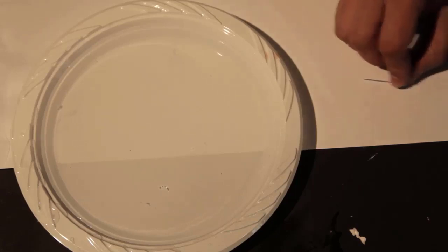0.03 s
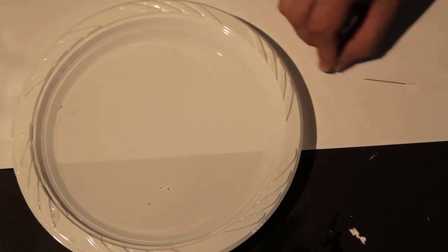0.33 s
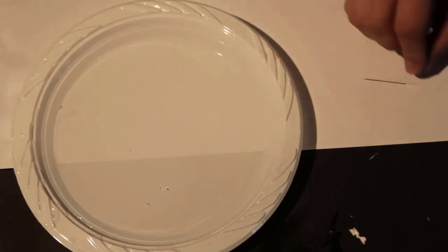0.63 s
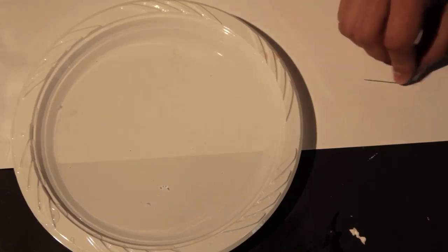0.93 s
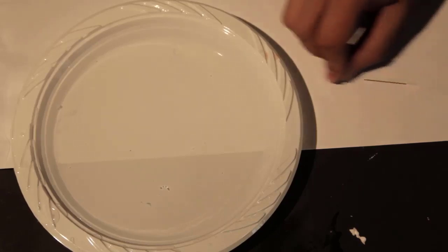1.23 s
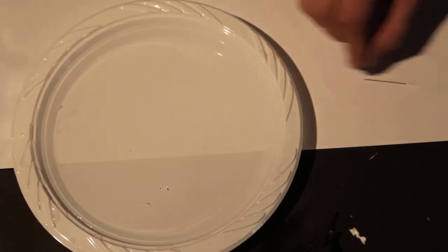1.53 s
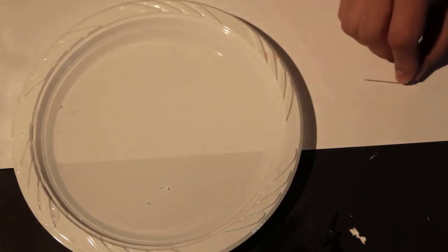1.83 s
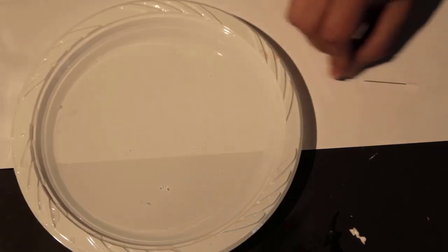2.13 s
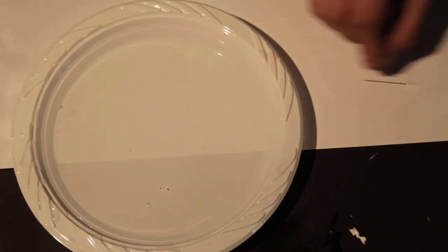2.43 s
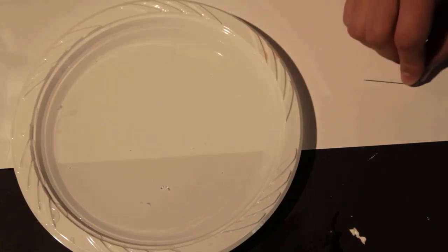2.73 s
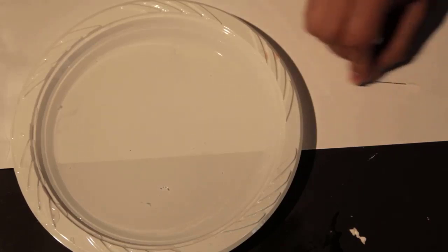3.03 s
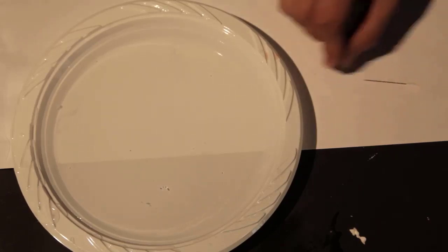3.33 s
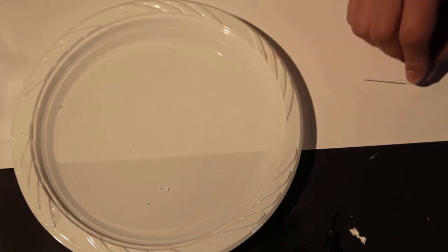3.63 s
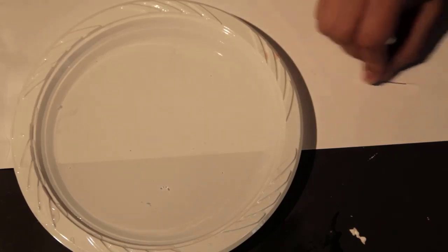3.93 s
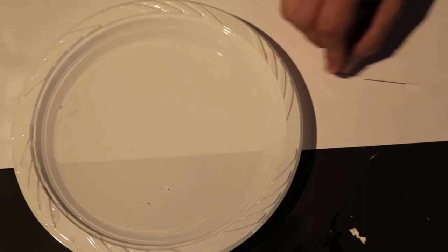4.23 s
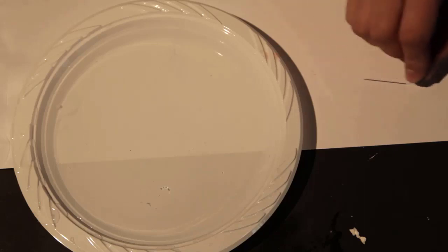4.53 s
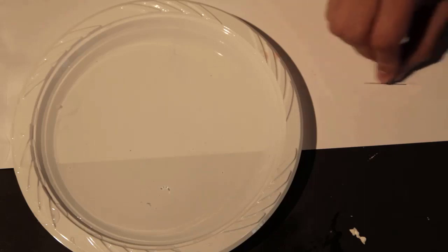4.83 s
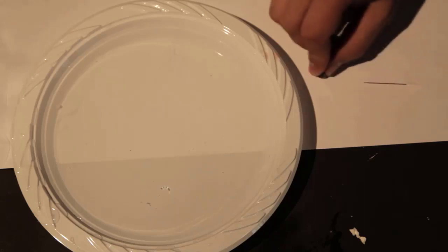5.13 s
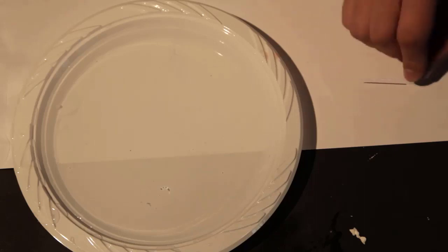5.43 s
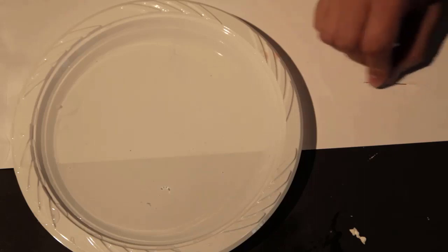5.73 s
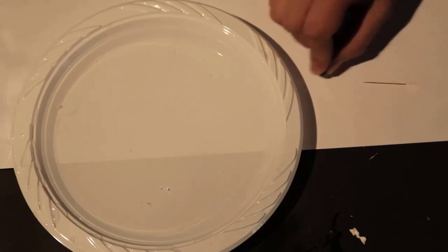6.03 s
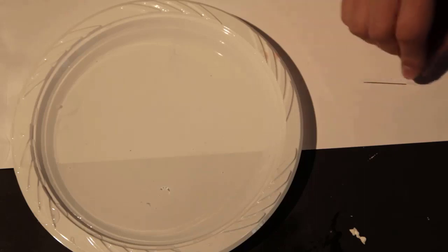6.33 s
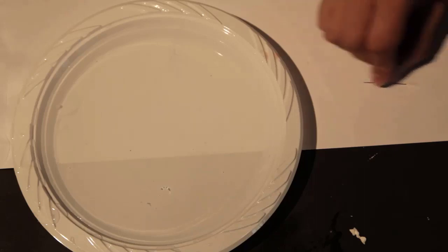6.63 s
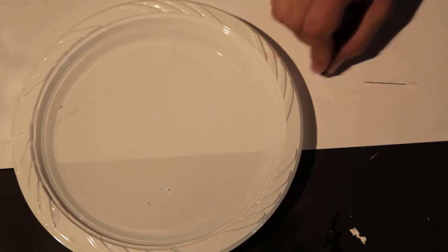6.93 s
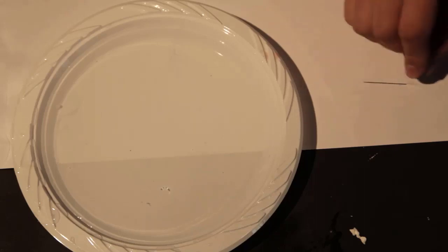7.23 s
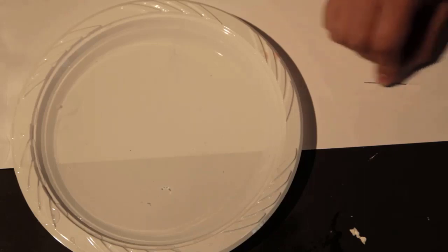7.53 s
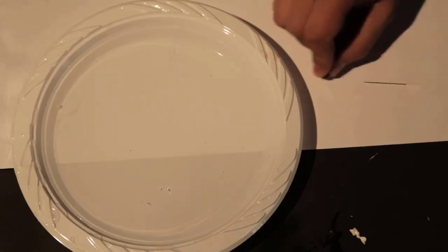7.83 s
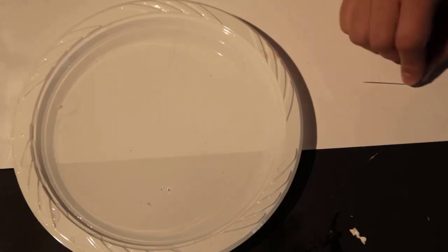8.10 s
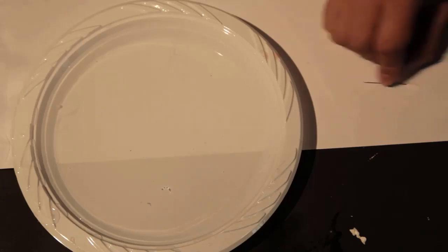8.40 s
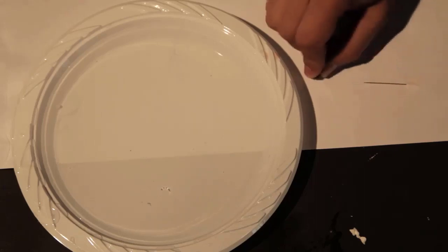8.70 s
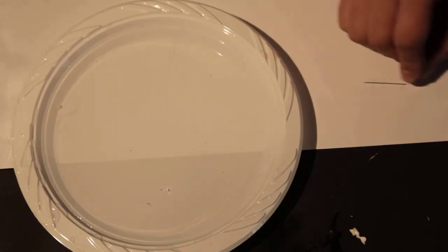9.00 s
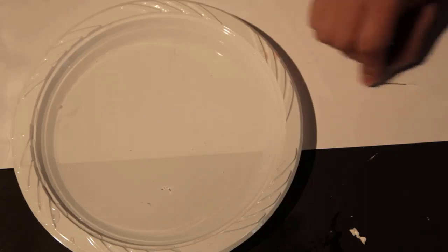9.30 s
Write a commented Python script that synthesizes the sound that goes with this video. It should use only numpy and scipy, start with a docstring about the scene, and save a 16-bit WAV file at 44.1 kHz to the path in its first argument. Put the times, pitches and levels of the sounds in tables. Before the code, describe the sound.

A low puff of air hits the close microphone as a needle starts scraping over paper in a quiet room. The short, papery strokes repeat steadily, eleven in all, each growing and easing off with a faint hollow rasp. Between them the hand lands on the table with a dull tap and the needle clicks. Tiny fibre snaps and brief judders roughen the rubbing, and the later landings are sharper.

```python
"""Stroking a needle on paper

Fingertips stroke a needle lying on a sheet of paper on a table: eleven short strokes in a quiet room.
The hand lands with a soft thud and the steel needle clicks. Slipping paper fibres hiss, and shake the
sheet and the table top into a murmur. Here and there a fibre snaps, or a stroke catches and judders.
Now and then moving air rumbles on the close microphone."""
import sys
import numpy as np
from scipy import signal
from scipy.fft import rfft, irfft
from scipy.io import wavfile
from scipy.ndimage import uniform_filter1d

SR = 44100
rng = np.random.default_rng(int(sys.argv[2]) if len(sys.argv) > 2 else 0)


def dump_mix(stems):
    """Bounce the given channels to the path in sys.argv[1] as a 16-bit WAV at rate SR."""
    frames = np.atleast_2d(stems).T  # one column per channel
    limited = np.clip(frames, -1, 1)  # hard clip at full scale
    pcm = np.round(limited * 32767).astype(np.int16)
    wavfile.write(sys.argv[1], SR, pcm)


N = 421596
TIME = np.arange(N) / SR
SHORT_TIME = np.arange(SR // 4) / SR   # a quarter second, for brief sounds


def from_db(db):
    """Turn decibels into a gain to multiply by."""
    return 10 ** (np.asarray(db) / 20)


def rms_one(x):
    """Scale a signal so that its average strength (rms) is 1."""
    return x / np.sqrt(np.mean(x ** 2) + 1e-20)


def colour(x, spectrum):
    """Shape the tone of a signal with rows of pitch in Hz and level in dB; the result has rms 1."""
    hz, db = np.transpose(spectrum)
    bin_hz = np.maximum(np.arange(len(x) // 2 + 1) * SR / len(x), 1)
    gain = from_db(np.interp(np.log(bin_hz), np.log(hz), db))
    return rms_one(irfft(rfft(x) * gain, len(x)))


def fade(t60):
    """A short dying curve that falls by 60 dB in t60 seconds."""
    return from_db(-60 * SHORT_TIME / t60)


def envelope(start, hold_s, db, rise_db_per_s, fall_db_per_s):
    """A gain that rises until the start time, holds, then fades."""
    early_s = np.maximum(start - TIME, 0)
    late_s = np.maximum(TIME - start - hold_s, 0)
    return from_db(db - rise_db_per_s * early_s - fall_db_per_s * late_s)


def flicker(depth_db, rate_hz):
    """A gain that wanders at random, typically by depth_db up or down."""
    steps = rng.standard_normal(2000)
    wander = np.interp(TIME * 2 * rate_hz, np.arange(len(steps)), steps)
    return from_db(depth_db * rms_one(wander))


def add(track, start, sound):
    """Mix a sound into a track at a start time in seconds."""
    first = max(round(start * SR), 0)
    track[first:first + len(sound)] += sound[:N - first]


# The tone of the quiet room. Each row: pitch in Hz, relative level in dB.
HUSH_TONE = [(15, 2.5), (35, 1), (80, -2.5), (135, 2), (230, -4), (380, -7.5), (450, -4), (600, -11.5),
             (780, -11.5), (1030, -11.5), (1150, -15), (1450, -14.5), (2200, -19.5), (4000, -29.5),
             (9000, -50)]
# How loud the far background is. Each row: time in seconds, level in dB.
HUSH_LEVELS = [(0.6, -50), (1.6, -53), (2.6, -53.5), (3.5, -54.5), (4.5, -56), (5.4, -55), (6.3, -57.5),
               (7.2, -59), (8.1, -52.5), (9.0, -52.5)]

def background():
    """The low hush of the room and the microphone's own faint hiss."""
    loudness = from_db(np.interp(TIME, *np.transpose(HUSH_LEVELS)))
    hush = loudness * colour(rng.standard_normal(N), HUSH_TONE)
    return hush + from_db(-68) * rng.standard_normal(N)


# Gusts on the microphone. Each row: start in seconds, length in seconds, relative strength in dB.
GUSTS = [(0.0, 0.081, 1.5), (0.265, .1, -2.5), (0.463, 0.027, -4.5), (1.988, 0.029, -13.5),
         (2.128, 0.15, -16.5), (2.286, 0.027, -11), (2.432, 0.026, -20), (4.114, .16, -17.5),
         (4.48, .17, -15), (6.785, 0.41, -22.5), (7.43, 0.13, -24.5)]

def airflow():
    """How strongly the air moves: gusts, the weak swirls they leave, and the stir of the moving hand."""
    flows = []
    for start, length, db in GUSTS:
        gust = envelope(start, length, db, rise_db_per_s=143, fall_db_per_s=119)
        wake = envelope(start, length, db - 21, rise_db_per_s=143, fall_db_per_s=20)
        flows += [gust, wake]
    for touch, fastest, *_ in STROKES:
        stir = envelope(touch, fastest - touch, db=-41.5, rise_db_per_s=156, fall_db_per_s=30)
        flows.append(stir)
    return np.max(flows, axis=0)


# The tones of big and of small swirls of air. Each row: pitch in Hz, relative level in dB.
BIG_SWIRL_TONE = [(6, -12), (14, -3), (27, 1.5), (40, -7), (48, -7.5), (62, -14), (76, -30), (140, -43),
                  (300, -70), (1000, -105)]
SMALL_SWIRL_TONE = [(20, -10), (55, 0), (72, 0), (130, -22.5), (200, -33), (1000, -96)]

def air_rumble():
    """Slow swirls press on the microphone; strong gusts break up into smaller, lumpy ones."""
    big = signal.hilbert(colour(rng.standard_normal(N), BIG_SWIRL_TONE))
    strength = np.sqrt(uniform_filter1d(np.abs(big) ** 2 / 2, size=SR // 5))
    flow = airflow()
    rumble = from_db(-7) * flow * big.real / strength   # evened out, so the flow sets the loudness
    small = colour(rng.standard_normal(N), SMALL_SWIRL_TONE) * flicker(depth_db=4.7, rate_hz=23)
    return rumble + from_db(-19.5) * flow ** 2 * small


def with_room_echo(sound, t60, echo_db):
    """Nearby walls add a faint wash of echoes that builds up, then dies."""
    tail = rng.standard_normal(len(SHORT_TIME)) * fade(t60) * (1 - fade(0.038))
    echoes = signal.fftconvolve(sound, tail / np.linalg.norm(tail))[:N]
    return sound + from_db(echo_db) * echoes


def ringing(notes, spread_db):
    """A struck object rings at its own notes, each with a slightly random strength."""
    out = 0
    for hz, db, t60 in notes:
        gain = from_db(db + spread_db * rng.standard_normal())
        out += gain * fade(t60) * np.sin(2 * np.pi * hz * SHORT_TIME)
    return out


def fibre_slips(per_s, spread_db):
    """Paper fibres slip at random moments with uneven force, making tiny ticks; rms 1."""
    sizes = from_db(spread_db * np.minimum(rng.exponential(1, N), 5))
    slipping = rng.random(N) < per_s / SR
    return rms_one(slipping * sizes * rng.choice([-1, 1], N))


def crack(tone, t60):
    """A few fibres break at once in a burst of noise; peak 1."""
    burst = colour(rng.standard_normal(len(SHORT_TIME)), tone) * fade(t60)
    return burst / np.abs(burst).max()


# The notes of the table top. Each row: pitch in Hz, relative level in dB, seconds to fade by 60 dB.
TABLE_NOTES = [(97.8, -8, 0.35), (137.7, -1.5, 0.16), (262, -4.5, 0.031), (293, 0.5, 0.04),
               (358, -4, 0.029), (449, -1.5, 0.077), (654, -2.5, 0.03), (756, -9.5, 0.041),
               (898, -18, 0.087), (1214, -13.5, 0.037), (1430, -4.5, 0.016), (1710, -11.5, 0.034),
               (1900, -8, 0.024), (1870, -17.5, 0.0031), (2730, -16, 0.048), (3070, -13, 0.02),
               (3670, -11, 0.015)]

def knock(contact_s, ring_db, rebound_db, rebound_t60):
    """The table dips under a push, swings back and rings; longer contact sounds duller. Peak 1."""
    push = np.exp(-(SHORT_TIME / contact_s - 2) ** 2)
    ring = from_db(ring_db) * ringing(TABLE_NOTES, spread_db=1.2)
    rebound = from_db(rebound_db) * fade(rebound_t60)
    sound = signal.fftconvolve(push, ring + rebound)[:len(push)] - push
    return sound / np.abs(sound).max()


def table_murmur():
    """Slipping fibres keep the table ringing; its notes waver in loudness."""
    slips = fibre_slips(per_s=3500, spread_db=4)
    out = np.zeros(N)
    for note in TABLE_NOTES:
        ring = signal.oaconvolve(slips, ringing([note], spread_db=-1.5))[:N]
        out += ring * flicker(depth_db=3.6, rate_hz=8.6)
    return rms_one(out)


# The hand lands. Each row: start in seconds, then paper crack, thud and nail tap levels in dB.
LANDINGS = [(0.745, -39.5, -27, -65), (0.8801, -29, -20, -38), (1.771, -39, -26, -62),
            (1.9789, -57, -28.5, -46), (2.7062, -49, -26, -53), (2.8184, -45, -28, -26.5),
            (3.7464, -37.5, -30.5, -24.5), (4.7171, -31.5, -20.5, -21), (5.5782, -46, -34, -42),
            (5.6066, -30.5, -25, -25.5), (6.521, -24.5, -19.5, -15.5), (7.4264, -45, -29, -31),
            (7.432, -22, -9, -22), (8.327, -51, -28, -50), (8.3474, -32, -22.5, -28),
            (9.1622, -20, -20.5, -17.5)]

def hand_landings():
    """Soft flesh makes a long contact and a dull thud; the nail taps and the paper cracks."""
    out = np.zeros(N)
    for start, crack_db, thud_db, tap_db in LANDINGS:
        thud = knock(contact_s=0.00083, ring_db=-35.5, rebound_db=-41, rebound_t60=0.032)
        tap = knock(contact_s=0.00025, ring_db=-31, rebound_db=-54, rebound_t60=0.01)
        add(out, start, from_db(thud_db) * thud)
        add(out, start + 0.00095, from_db(tap_db) * tap)
        add(out, start + 0.0017, from_db(crack_db) * crack(PAPER_TONE, t60=0.0054))
    return out


# The notes of the needle. Each row: pitch in Hz, relative level in dB, seconds to fade by 60 dB.
NEEDLE_NOTES = [(1214, -10, 0.048), (1653, -0.5, 0.026), (3010, -4.5, 0.03), (3300, -0.5, 0.019),
                (3670, 0, 0.0074), (7900, 3, 0.011), (8250, 0.5, 0.017), (13700, 1, 0.0077)]
# The needle clicks. Each row: start in seconds, then crack, knock and ring levels in dB.
CLICKS = [(0.0712, -35, -27, -42), (1.0166, -28.5, -22.5, -42.5), (1.879, -43.5, -40, -56),
          (2.93, -34.5, -25, -44), (3.8945, -27, -21.5, -37.5), (4.8182, -26, -22, -39),
          (5.68, -37, -24, -45), (6.5996, -36, -22, -43), (7.547, -25, -18, -36), (8.43, -28, -18.5, -36),
          (9.2437, -27.5, -21.5, -37)]

def needle_clicks():
    """Hard steel makes a short contact: a crack, a light knock and a brief ring."""
    out = np.zeros(N)
    for start, crack_db, knock_db, ring_db in CLICKS:
        add(out, start + 0.001, from_db(crack_db) * crack(PAPER_TONE, t60=0.014))
        light_knock = knock(contact_s=0.00024, ring_db=-29.5, rebound_db=-24, rebound_t60=0.012)
        add(out, start + 0.001, from_db(knock_db) * light_knock)
        add(out, start + 0.0007, from_db(ring_db) * ringing(NEEDLE_NOTES, spread_db=0.4))
    return out


# The tone of a snapping fibre. Each row: pitch in Hz, relative level in dB.
SNAP_TONE = [(3000, -32), (6000, -12), (9000, -2), (12000, 12), (16000, -26)]
# When fibres snap, plus one bright tick of the needle at 9.14 s, heard without its ring. Each row: start in
# seconds, peak level in dB.
SNAPS = [(0.159, -24.5), (0.2518, -18), (0.776, -32), (1.1205, -20.5), (1.2544, -29), (1.318, -25),
         (2.166, -22), (4.996, -23), (5.8366, -24), (6.7565, -27), (7.7645, -31), (8.5874, -30),
         (9.1437, -30)]

def fibre_snaps():
    """Single fibres break with tiny bright cracks that stand out of the hiss; once the needle ticks just as
    brightly."""
    out = np.zeros(N)
    for start, db in SNAPS:
        add(out, start, from_db(db) * crack(SNAP_TONE, t60=0.0035))
    return out


# A stroke catches. Each row: start in seconds, first slip's peak in dB, drop per slip in dB.
SNAGS = [(0.153, -35, 0.8), (0.249, -32, 2.5), (1.151, -27.5, 2.1), (1.18, -30, 3), (2.084, -25.5, .4),
         (4.029, -23, 1.5), (4.882, -29.5, 0.5), (4.93, -33, 2), (5.765, -33, 1.2), (6.731, -31, 2),
         (7.6825, -15.5, 4), (8.529, -20, 2.5), (9.388, -20.5, 1.5)]

def stroke_snags(slip_count=11, mean_gap_s=0.0036):
    """The stroke sticks, then breaks free in a quick run of ever weaker slips."""
    out = np.zeros(N)
    for start, db, drop_db in SNAGS:
        slip = knock(contact_s=0.00024, ring_db=-34, rebound_db=-31.5, rebound_t60=0.018)
        gaps = mean_gap_s * rng.uniform(0.5, 1.5, size=slip_count)
        for k, delay in enumerate(np.cumsum(gaps) - gaps[0]):
            add(out, start + delay, from_db(db - drop_db * k) * slip)
    return out


# The bright tone of paper. Each row: pitch in Hz, relative level in dB.
PAPER_TONE = [(2470, -5), (4200, -9.5), (4750, -11), (5370, -10.5), (8170, -0.5), (9250, 5), (11400, 5),
              (15000, -5), (16000, -11.5)]

def paper_hiss():
    """Many small slips and rarer hard catches make a bright hiss; its treble bands waver at random."""
    slips = fibre_slips(per_s=14000, spread_db=-1)
    catches = from_db(-9) * fibre_slips(per_s=210, spread_db=5)
    spectrum = rfft(slips + catches)
    bin_hz = np.arange(N // 2 + 1) * SR / N
    centres_hz = np.linspace(6000, 15000, 8)
    hiss = np.zeros(N)
    for one_band in np.eye(len(centres_hz)):
        band = irfft(spectrum * np.interp(bin_hz, centres_hz, one_band), N)
        hiss += band * flicker(depth_db=2, rate_hz=18)
    return colour(hiss, PAPER_TONE)


# Light touches between strokes. Each row: start in seconds, length in seconds, level in dB.
GRAZES = [(-0.005, 0.035, -49), (0.782, 0.047, -57), (0.865, 0.12, -65), (1.774, 0.0073, -60),
          (1.897, 0.069, -65), (3.722, 0.045, -64), (5.201, 0.0072, -59), (6.968, .008, -64),
          (7.886, 0.0067, -57), (8.173, 0.017, -61), (8.21, .04, -69), (8.8, 0.012, -72)]

def finger_grazes():
    """The gain of the brief hiss made when a fingertip brushes the paper."""
    return sum(envelope(start, length, db, rise_db_per_s=682, fall_db_per_s=445)
               for start, length, db in GRAZES)


def stroke_shape(touch, fastest, peak, lift, swell_db_per_s, jump_db, ease):
    """One stroke's gain swells to a peak, then eases off until the hand lifts."""
    t = np.arange(round(touch * SR), round(lift * SR)) / SR
    below_peak_db = swell_db_per_s * np.maximum(peak - t, 0)
    # most strokes grow suddenly louder in the 0.05 seconds before the fastest moment
    below_peak_db += jump_db * np.clip((fastest - t) / 0.05, 0, 1)
    slowing = np.clip((t - peak) / (lift - peak), 0, 1)
    out = np.zeros(N)
    add(out, touch, from_db(-below_peak_db) * np.cos(np.pi / 2 * slowing) ** ease)
    return out


# The sheet's low murmur and its hollow rasp. Each row: pitch in Hz, relative level in dB.
SHEET_TONE = [(60, -28), (130, 4.5), (300, 11), (460, 2), (600, -11), (1100, -7.5), (2000, -28),
              (2500, -21.5), (3600, -16.5), (5000, -51), (8000, -37)]
RASP_TONE = [(900, -14), (1300, -4), (1420, 3), (1650, -4), (1900, 2.5), (2100, -2), (2300, -7),
             (3000, -28)]
# The strokes. Each row: the times in seconds of touch, fastest motion, hardest press and lift, then
# relative hiss level in dB, swell in dB per second, jump in dB, relative murmur and rasp levels in dB.
STROKES = [(0.061, 0.245, 0.277, 0.45, -35, 22, 8, -36.5, -47),
           (1.001, 1.208, 1.287, 1.482, -42.0, 34, 4, -42.5, -55.5),
           (1.978, 2.094, 2.162, 2.385, -40.5, 119.5, 5, -40.0, -52),
           (2.7, 3.053, 3.091, 3.333, -36.5, 69, 7, -37, -52.5),
           (3.79, 4.048, 4.098, 4.243, -36.5, 85, 4, -38.5, -49),
           (4.711, 4.977, 5.016, 5.204, -41, 74, 0.0, -39.5, -51.5),
           (5.587, 5.884, 5.918, 6.043, -35, 67, 2.5, -36, -51.5),
           (6.513, 6.762, 6.813, 6.957, -39, 67, 3.5, -38, -49),
           (7.424, 7.676, 7.723, 7.884, -38.5, 91, -1, -39, -48),
           (8.34, 8.53, 8.587, 8.84, -39.5, 79, 1.5, -40.5, -51),
           (9.138, 9.366, 9.413, 9.62, -39, 98, 0.5, -39, -48.5)]

def finger_strokes():
    """Slipping fibres hiss with the stroke's speed; its pressure makes them shake the sheet and table."""
    hiss_gain, murmur_gain, rasp_gain = np.zeros((3, N))
    for touch, fastest, hardest, lift, hiss_db, swell, jump_db, murmur_db, rasp_db in STROKES:
        speed = stroke_shape(touch, fastest, fastest, lift, swell, jump_db, ease=2.12)
        pressure = stroke_shape(touch, fastest, hardest, lift, 0.86 * swell, jump_db, ease=2.64)
        hiss_gain += from_db(hiss_db + 0.35) * speed
        murmur_gain += from_db(murmur_db) * pressure
        rasp_gain += from_db(rasp_db - 0.5) * pressure
    hiss = (hiss_gain + finger_grazes()) * paper_hiss()
    table = from_db(0.74) * table_murmur()
    sheet = from_db(-1) * colour(fibre_slips(per_s=4000, spread_db=6), SHEET_TONE)
    rasp = colour(fibre_slips(per_s=1500, spread_db=-1), RASP_TONE) * flicker(depth_db=0.57, rate_hz=12)
    grip = flicker(depth_db=1.32, rate_hz=16)   # friction is slightly uneven along the way
    return grip * (hiss + murmur_gain * (table + sheet) + rasp_gain * rasp)


def scene():
    """Hand, needle and paper close to one microphone."""
    hand = finger_strokes() + hand_landings() + needle_clicks() + fibre_snaps() + stroke_snags()
    mix = with_room_echo(hand, t60=0.15, echo_db=-12) + air_rumble() + background()
    return mix[None]


def record(dry, ceiling=0.85, cutoff_hz=15900):
    """Round off the strongest gusts and steeply cut the highest treble."""
    rounded = ceiling * np.tanh(dry / ceiling)
    low_pass = signal.ellip(10, 0.1, 80, cutoff_hz, fs=SR, output="sos")
    return signal.sosfilt(low_pass, rounded)


dry = scene()
out = record(dry)
dump_mix(out)
```